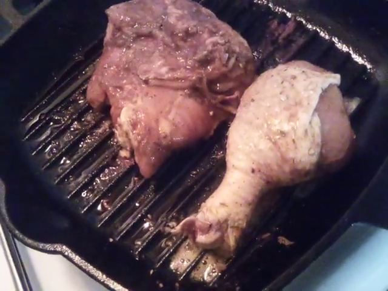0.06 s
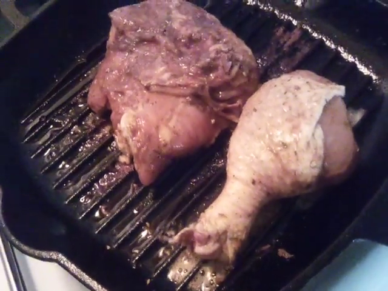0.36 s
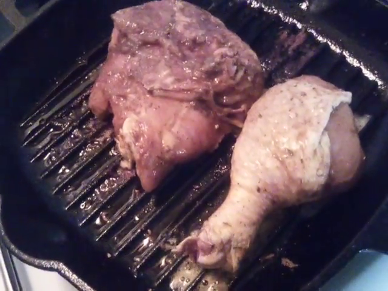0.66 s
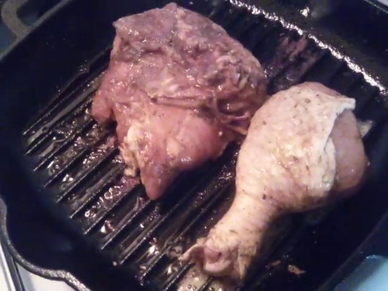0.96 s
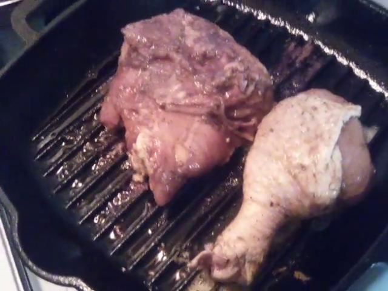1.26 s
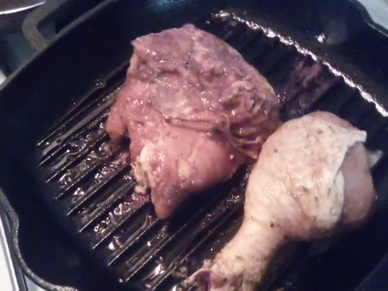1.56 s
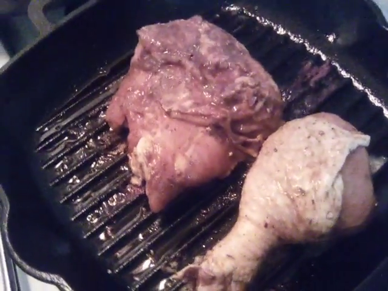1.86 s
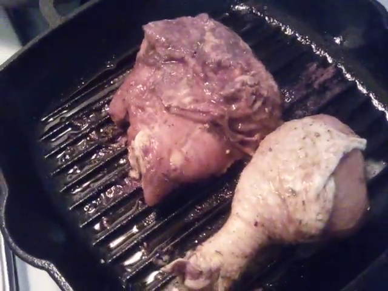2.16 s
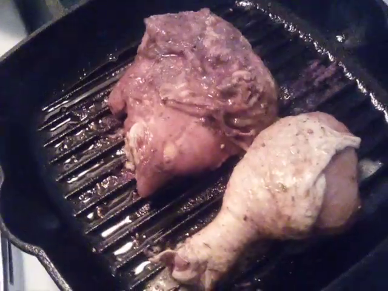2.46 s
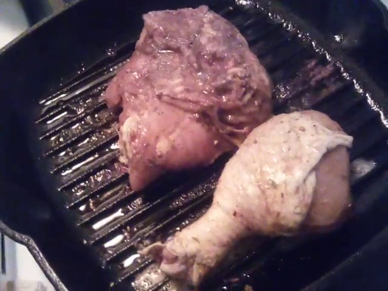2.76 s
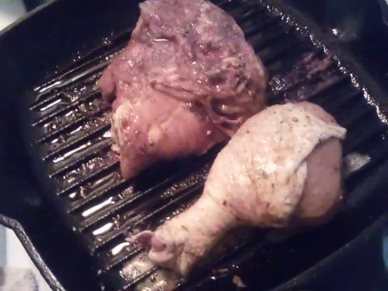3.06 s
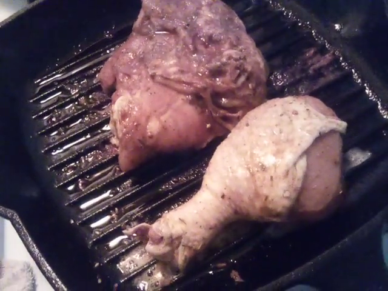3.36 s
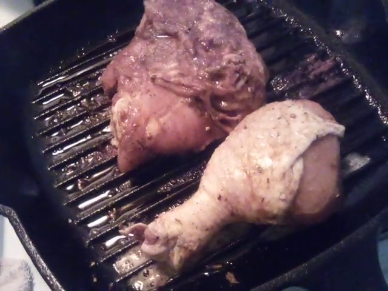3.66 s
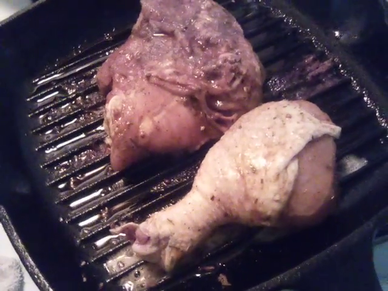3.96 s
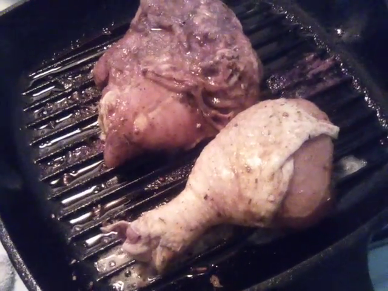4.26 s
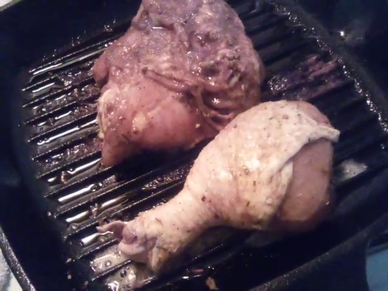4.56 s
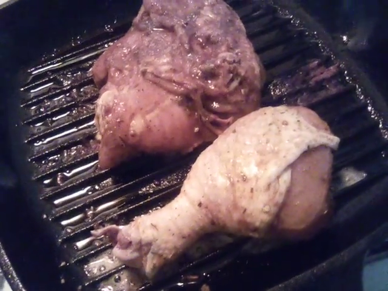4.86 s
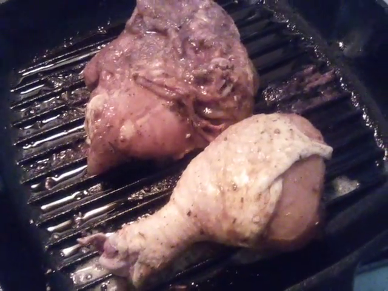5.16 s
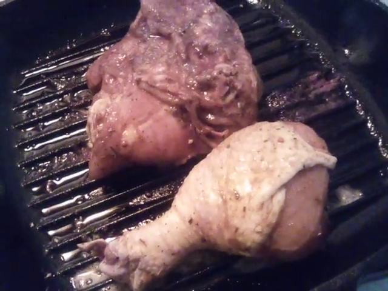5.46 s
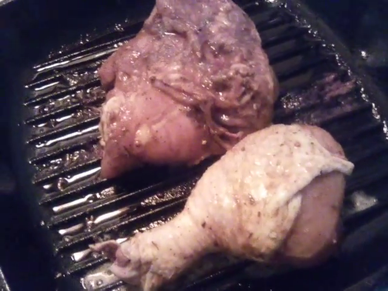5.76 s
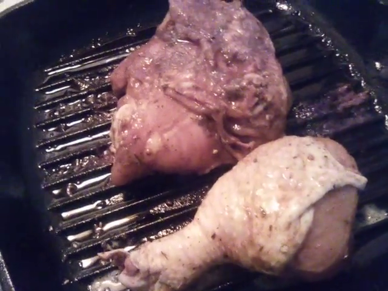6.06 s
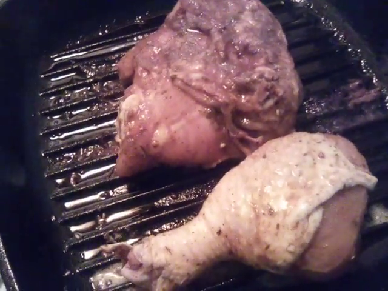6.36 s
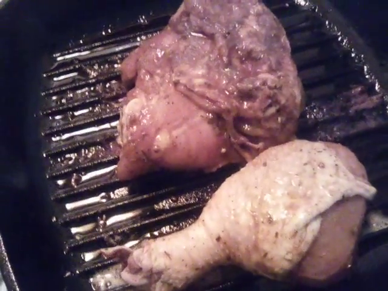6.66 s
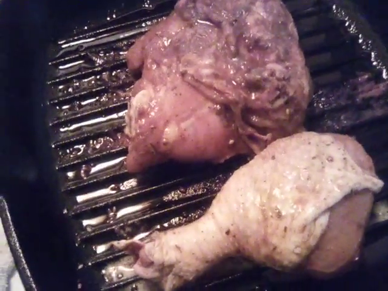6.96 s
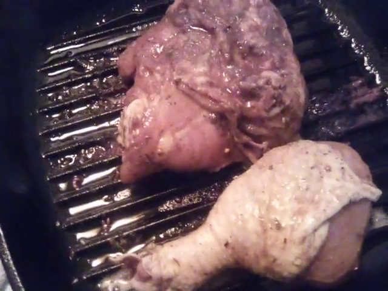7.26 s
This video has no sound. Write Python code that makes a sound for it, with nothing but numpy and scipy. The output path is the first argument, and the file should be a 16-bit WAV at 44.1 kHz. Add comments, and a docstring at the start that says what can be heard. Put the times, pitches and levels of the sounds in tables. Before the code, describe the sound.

Meat fries in a ribbed iron pan, heard up close as a continuous high hiss with dense crackling. Sharp droplet ticks, short squeaky spits and small pops of fat come at irregular moments, some with a slight ring from the iron. The sizzle swells a little at the end with a brief sputter of steam. Behind it are only a faint kitchen hum and a few soft low bumps.

```python
"""Chicken sizzles in an oiled cast-iron grill pan, close by in a home kitchen.
Tiny steam bubbles burst in a bright fizz; larger ones crackle between the ribs. Fat gurgles and pops,
pockets of juice spit in short chirps, droplets snap, and the iron rings. Near the end, spurts of steam
ring a groove of the pan. Underneath: faint mains hum, kitchen rumble and a few soft low bumps."""
import sys
import numpy as np
from scipy import signal
from scipy.fft import rfft, irfft
from scipy.io import wavfile

SR = 44100
rng = np.random.default_rng(int(sys.argv[2]) if len(sys.argv) > 2 else 0)


def master_out(mix):
    """Clip the mix to full scale and print it as 16-bit PCM to the path in sys.argv[1]."""
    frames = np.transpose(np.atleast_2d(mix))
    ceiling = np.clip(frames, -1, 1)
    pcm = np.round(ceiling * 32767).astype(np.int16)
    wavfile.write(sys.argv[1], SR, pcm)


N = 326547
TIME_S = np.arange(N) / SR

# Table levels are relative; each source adds its own gain.
# boiling of the oil: t/s, level/dB
OIL_BOIL = [(0.0, -46.5), (0.89, -47.5), (1.03, -44), (1.52, -48.5), (1.98, -47.5), (2.39, -46.5),
            (4.0, -49.5), (4.43, -45.5), (4.74, -47.5), (6.55, -46), (7.4, -42)]
# simmering of the juice under the meat: t/s, level/dB
JUICE_SIMMER = [(0.0, -57), (0.37, -57.5), (1.2, -57.5), (1.95, -58), (2.4, -57), (3.3, -58.5),
                (3.7, -58.5), (4.25, -57), (4.63, -59.5), (5.3, -55), (5.7, -57), (6.55, -56.5),
                (6.73, -56.5), (6.85, -55), (7.05, -54), (7.4, -57.5)]
# spectra of one burst of each kind: f/Hz, level/dB
FIZZ_SPECTRUM = [(500, -45.5), (2000, -18), (3100, -22), (6000, -18), (8400, -22.5), (9400, -17),
                 (10400, -13), (10800, -9), (12300, -3), (13800, -10), (15000, -15), (16000, -2.5)]
CRACKLE_SPECTRUM = [(200, -21), (750, -7.5), (1100, -2.5), (1600, -5.5), (3050, 3.5), (3700, 2),
                    (4500, 2.5), (6300, 4.5), (7300, 6.5), (8400, -26), (12000, 8)]
SPLUTTER_SPECTRUM = [(200, -33.5), (700, -1.5), (1100, -4.5), (1600, 5.5), (2500, 4.5), (3100, 2.5),
                     (6000, 9), (8400, 6.5), (11000, -16.5)]
# resonances of the iron pan and its hollow: f/Hz, width/Hz, level/dB
PAN_MODES = [(515, 30, -11), (920, 50, -15), (1185, 45, -5), (1355, 40, -7), (1453, 40, -9),
             (1610, 120, -4.5), (2030, 60, -7), (2280, 70, -7), (2660, 110, -7), (3600, 80, -5),
             (3830, 80, -6), (4040, 80, -6), (4450, 90, -7), (4620, 80, -9), (5110, 80, -7), (5385, 70, -7),
             (5950, 90, -10), (6245, 80, -8)]
# kitchen rumble: f/Hz, level/dB
RUMBLE_SPECTRUM = [(20, -5), (50, -9.5), (90, -1.5), (135, -0.5), (185, -2.5), (240, 2.5), (300, -2),
                   (380, -7.5), (700, -10), (1500, -20.5), (6000, -28)]
# mains hum: f/Hz, level/dB
MAINS_HUM = [(119.5, -86.5)]
# slow fat bubbles, and two rows at 5.5 s that give a pop there its dull low body: t/s, peak level/dB, f/Hz,
# length/s
FAT_GURGLES = [(0.118, -53.5, 1360, 0.084), (0.696, -51, 1330, 0.022), (0.994, -49.5, 1480, 0.1),
               (1.762, -43, 1534, 0.031), (1.826, -47, 1350, 0.02), (2.019, -48, 1500, 0.023),
               (2.451, -51, 1640, 0.047), (3.114, -51.5, 1680, 0.08), (3.606, -50.5, 1380, 0.032),
               (3.905, -50, 1600, 0.032), (3.955, -53, 2300, 0.025), (5.497, -54.5, 775, 0.015),
               (5.5, -55, 1100, 0.012), (5.605, -52, 1470, 0.025), (5.844, -53.5, 1150, 0.049),
               (7.194, -39, 1660, 0.0053), (7.38, -41, 2030, .04)]
# spitting pockets of juice: t/s, ping level/dB, f/Hz, steam level/dB, time to run dry/s
JUICE_SPITS = [(0.2392, -40.0, 4060, -52.0, 0.03), (0.2655, -39.5, 5040, -59.5, 0.02),
               (0.6202, -39.0, 3780, -53.5, 0.026), (0.7309, -43.0, 3800, -54.5, 0.029),
               (0.9316, -44.5, 9000, -66.0, 0.01), (1.0144, -50.5, 4500, -61.0, 0.03),
               (1.2958, -44.5, 4650, -62.0, 0.04), (1.4463, -41.5, 6200, -61.0, 0.02),
               (1.5114, -45.0, 5500, -61.0, 0.025), (1.775, -39.5, 3900, -54.0, 0.037),
               (2.2719, -33.5, 3340, -46.0, 0.026), (2.4452, -41.5, 4700, -56.0, 0.04),
               (2.4732, -41.0, 4690, -54.5, 0.04), (2.4899, -38.5, 3800, -56.0, 0.045),
               (2.8885, -37.0, 5080, -54.0, 0.03), (2.9062, -38.0, 4700, -57.0, 0.05),
               (2.9619, -39.5, 4550, -60.0, 0.025), (3.0225, -38.0, 4300, -50.5, 0.012),
               (3.0328, -28.0, 4500, -53.5, 0.028), (3.1024, -35.5, 4550, -55.0, 0.02),
               (3.1092, -36.5, 4050, -57.5, 0.028), (3.1962, -38.5, 4620, -56.5, 0.03),
               (3.3232, -37.5, 4200, -56.0, 0.025), (3.395, -38.5, 5370, -57.0, 0.04),
               (3.486, -41, 4300, -60, .02), (3.635, -39, 4620, -57, .025),
               (3.7789, -40, 5200, -55.5, 0.025), (3.783, -39, 4300, -57, .02),
               (3.893, -37, 6600, -53.5, .03), (3.915, -44, 3700, -58, .06), (3.985, -41, 4100, -58, .02),
               (4.02, -32.0, 4420, -50.0, 0.04), (4.1147, -40.0, 5400, -58.0, 0.03),
               (4.3189, -29.0, 4560, -47.5, 0.02), (4.3278, -25.5, 4500, -47.5, 0.04),
               (4.3478, -33.5, 4350, -54.0, 0.03), (4.3915, -34.0, 4080, -51.5, 0.06),
               (4.4347, -31.0, 3700, -53, 0.07), (4.4608, -36.5, 5400, -51.5, 0.02),
               (4.4692, -31.0, 5300, -57, 0.04), (4.7019, -31, 5300, -49.5, 0.018),
               (4.722, -41, 5700, -54, .035), (4.817, -40, 3700, -59, .02),
               (4.9007, -38.0, 4620, -62.5, 0.04), (5.0883, -36, 5400, -52.0, 0.02),
               (5.1936, -34.0, 4050, -50.5, 0.02), (5.2317, -39.5, 3450, -57.0, 0.025),
               (5.5862, -33.5, 4160, -51.0, 0.027), (5.712, -39, 5900, -56, .02),
               (5.8978, -38.5, 4400, -59.0, 0.045), (6.03, -41, 5000, -59, .02),
               (6.232, -39.0, 4700, -59.0, 0.028), (6.3559, -38.0, 4440, -54.5, 0.02),
               (6.4396, -36.5, 4440, -52.5, 0.034), (6.6261, -35.0, 3940, -50.0, 0.033),
               (6.7812, -38.0, 3950, -55.5, 0.03), (6.7958, -40, 4450, -56, .025),
               (6.815, -43, 3620, -57.0, 0.04), (7.3107, -45.5, 4150, -56.0, 0.025),
               (7.3349, -41.0, 4300, -56.5, 0.03)]
# soft low bumps: t/s, length/s, peak level/dB, f/Hz
LOW_BUMPS = [(0.301, 0.032, -75, 116), (1.447, 0.058, -69.5, 144), (2.085, 0.044, -67, 113),
             (4.127, 0.034, -73, 118), (4.41, 0.043, -74, 235), (4.6, 0.036, -73, 122),
             (4.664, 0.056, -69, 118), (5.4, 0.13, -63.5, 233), (5.503, 0.0096, -76, 440),
             (5.64, 0.1, -65.5, 125), (7.19, 0.061, -65.5, 235)]
# exploding droplets: t/s, peak level/dB
DROPLET_SNAPS = [(0.5506, -31), (0.5631, -29), (0.824, -26), (0.9393, -24), (1.1333, -27), (1.1563, -26),
                 (1.1884, -24), (1.5828, -29), (1.6751, -28), (1.6881, -27), (1.8487, -23.5), (2.642, -34),
                 (2.7444, -26), (2.9773, -27), (3.134, -25.5), (3.207, -24), (3.5513, -26), (3.9973, -24),
                 (4.0543, -25), (4.2522, -26), (4.5572, -22.5), (4.782, -22), (5.044, -29), (5.2124, -20.5),
                 (5.3502, -30), (5.6274, -32), (5.848, -25), (6.1485, -26), (6.1598, -22.5), (6.6363, -21),
                 (6.6834, -29), (6.7805, -27), (7.229, -23)]
# fat pops: t/s, knock level/dB, splutter level/dB, build-up/s, time to run dry/s, hollow f/Hz
FAT_POPS = [(0.583, -55, -69.5, .002, 0.013, 2260), (0.707, -39, -58, 0.0041, 0.042, 4000),
            (0.855, -46, -63, 0.002, 0.012, 3070), (0.9167, -45, -69, 0.0055, 0.03, 3480),
            (0.9908, -40, -60.5, 0.0052, 0.032, 3140), (1.066, -45, -63, 0.0044, 0.014, 2970),
            (1.147, -48, -60.5, .002, 0.053, 2280), (1.273, -36, -54.5, 0.008, 0.031, 3150),
            (1.422, -50, -64.5, 0.035, 0.015, 2330), (1.5838, -37.5, -66.5, 0.00067, 0.011, 1690),
            (2.0293, -47.5, -77, 0.002, 0.039, 2200), (2.242, -45, -59, 0.0042, 0.017, 2840),
            (2.4637, -49, -69, 0.0035, 0.043, 1710), (2.5538, -40, -59.5, 0.0004, 0.021, 2680),
            (2.7466, -44, -68, 0.0012, 0.023, 3030), (2.8475, -59, -60.5, 0.002, 0.094, 3040),
            (2.934, -50, -64, 0.012, 0.073, 4840), (3.111, -50, -62.5, 0.0046, 0.03, 3040),
            (3.5241, -44, -62.5, 0.0011, 0.014, 2600), (3.611, -42, -66, 0.0022, 0.019, 1420),
            (3.8939, -42, -58.5, 0.013, 0.047, 2480), (4.388, -46, -63, 0.0037, 0.044, 5000),
            (4.435, -35.5, -51.5, 0.0025, 0.023, 2480), (4.4706, -44, -57, .008, 0.06, 4870),
            (4.566, -44, -65, .001, 0.016, 3300), (4.7314, -40, -55.5, 0.0041, 0.048, 2440),
            (4.926, -49, -55.5, 0.0022, 0.051, 4900), (5.147, -40, -59.5, 0.0029, 0.007, 4300),
            (5.503, -46, -69, 0.003, 0.039, 1300), (5.55, -40, -57, 0.0036, .015, 6000),
            (5.959, -42, -63, .004, 0.018, 4500), (6.063, -45, -70, .002, .01, 1950),
            (6.1624, -44, -61.5, 0.00066, 0.016, 2720), (6.286, -50, -76, .002, 0.0048, 1910),
            (6.359, -59, -63, .003, 0.017, 2360), (6.441, -50, -63, .003, .03, 2580),
            (6.6261, -38, -62, 0.002, 0.02, 3170), (6.862, -45, -62, 0.0015, 0.028, 4360),
            (6.967, -50, -59, 0.0012, 0.094, 2940), (7.103, -34, -72, 0.00072, 0.0072, 3230)]
# steam spurts from a groove: t/s, level/dB, time to run dry/s
STEAM_SPURTS = [(7.102, -52, .018), (7.138, -55, .012), (7.164, -53, .016), (7.196, -49, .022),
                (7.223, -53.5, .035), (7.255, -53.5, .04), (7.3, -60, .03), (7.355, -58, .02),
                (7.383, -55, .04)]
# resonances of that groove: f/Hz, width/Hz, level/dB
GROOVE_MODES = [(930, 35, -19), (1210, 35, -5), (1470, 40, -6), (1650, 60, 2), (1740, 60, 0),
                (2020, 60, -6), (2210, 50, -3), (3620, 45, -4), (4120, 80, 2.5), (4620, 50, -1),
                (6230, 130, -1)]
# kitchen reverberation: f/Hz, t60/s
ROOM_DECAY = [(200, 0.48), (1500, 0.16), (5000, 0.11), (14000, 0.39)]


def amp(db):
    """Decibels to gain."""
    return 10 ** (np.asarray(db) / 20)


def unit_rms(x):
    """Scales to rms 1."""
    return x / np.sqrt(np.mean(x ** 2) + 1e-20)


def at_peak(x, db=0):
    """Sets the peak level."""
    return amp(db) * x / abs(x).max()


def at_onset(x, db):
    """Sets the rms level of the first 25 ms."""
    return amp(db) * x / x[:SR // 40].std()


def lookup(table, hz):
    """Interpolates on a log-frequency axis."""
    table_hz, value = np.transpose(table)
    return np.interp(np.log(hz + 1), np.log(table_hz), value)


def follow(curve):
    """Level curve to gain per sample."""
    return amp(np.interp(TIME_S, *np.transpose(curve)))


def add(mix, t_s, sound):
    """Mixes a sound in at t_s."""
    part = mix[max(round(t_s * SR), 0):][:len(sound)]
    part += sound[:len(part)]


def convolve(x, response):
    """Convolution cut to the length of x."""
    return signal.oaconvolve(x, response)[:len(x)]


def click(spectrum, size=2048):
    """Minimum-phase pulse with this spectrum."""
    hz = abs(np.fft.fftfreq(size, 1 / SR))
    log_gain = np.log(amp(lookup(spectrum, hz)))
    return np.fft.ifft(np.exp(np.conj(signal.hilbert(log_gain)))).real[:size // 2]


def resonate(x, hz, width_hz):
    """Two-pole resonance, gain 1."""
    return signal.lfilter(*signal.iirpeak(hz, hz / width_hz, fs=SR), x)


def wander(corner_hz):
    """Random drift of rms 1, from 2 Hz up, fading above the corner."""
    hz = np.fft.rfftfreq(N, 1 / SR)
    band = (hz > 2) / (1 + (hz / corner_hz) ** 2)
    return unit_rms(irfft(rfft(rng.standard_normal(N)) * band, N))


def bursts(per_s, spread_db, size=N):
    """Bubbles burst at random, with either sign: many small, a few large."""
    draw = rng.random(size) * SR / per_s
    hits, train = np.flatnonzero(draw < 1), np.zeros(size)
    train[hits] = (-1.) ** hits * amp(spread_db * np.minimum(-np.log(draw[hits]), 4))
    return train


def surges(per_s, decay_s, depth):
    """One burst sets off its neighbours: the gain jumps, then decays."""
    kicks = rng.exponential(1, N) * (rng.random(N) < per_s / SR)
    flares = signal.lfilter([1], [1, -np.exp(-1 / (decay_s * SR))], kicks)
    return 1 + depth * np.tanh(flares)


def rim_echo(x, gain=1.0):
    """Reflection off the rim; the delay depends on the spot in the pan."""
    delay = int(rng.uniform(.001, .0025) * SR)
    return x + gain * np.pad(x, (delay, 0))[:len(x)]


def flurry(per_s, spread_db, t60_s, dry_s, build_s):
    """A train of bursts builds up, decays and runs dry; the rim echoes it."""
    t = np.arange(SR // 7) / SR
    rise = np.minimum(t / build_s, 1) ** 2
    fall = np.exp(-np.log(1000) * t / t60_s - (t / dry_s) ** 2)
    return rim_echo(bursts(per_s, spread_db, len(t)) * rise * fall)


def pan_ring(x):
    """The pan's hollow rings; each spot weights and detunes the modes differently."""
    spot = rng.uniform([-9, -.025], [5, .025], (len(PAN_MODES), 2))
    return sum(amp(db + weight_db) * resonate(x, hz * (1 + detune), width_hz)
               for (hz, width_hz, db), (weight_db, detune) in zip(PAN_MODES, spot))


def in_pan(x, ring_db):
    """Direct sound plus pan ring."""
    return x + amp(ring_db) * pan_ring(x)


def fizz(gain_db=1.0, haze_db=-.5, drift_db=2.1):
    """Tiny bubbles of three sizes, in a drifting mix, burst in clumps over a haze of smaller ones."""
    bubbles = np.zeros(N)
    for hz in (9500, 12200, 14800):
        ticks = resonate(bursts(per_s=900, spread_db=4.2), hz, width_hz=3200)
        bubbles += ticks * amp(drift_db * wander(corner_hz=6))
    train = unit_rms(bubbles) + amp(haze_db) * rng.standard_normal(N)
    train *= surges(per_s=80, decay_s=.004, depth=.9)
    return amp(gain_db) * follow(OIL_BOIL) * unit_rms(convolve(train, click(FIZZ_SPECTRUM)))


def crackle(gain_db=.94, spots=6):
    """Larger bubbles burst between the ribs; each spot flares up with its own colour and pan ring."""
    out = np.zeros(N)
    for hz in np.linspace(2000, 6600, spots):
        train = bursts(per_s=240, spread_db=3.4) * amp(4.5 * np.tanh(wander(corner_hz=12)))
        train *= surges(per_s=9, decay_s=.016, depth=2.2)
        out += in_pan(.8 * train + resonate(train, hz, width_hz=700), ring_db=11)
    return amp(gain_db) * follow(JUICE_SIMMER) * unit_rms(convolve(out, click(CRACKLE_SPECTRUM)))


def bubbling(gain_db=-8, spots=20):
    """Fat bubbles under the meat in overlapping spells; only a diffuse pan ring gets out."""
    out, splash = np.zeros(N), click(SPLUTTER_SPECTRUM)
    for _ in range(spots):
        spell = flurry(per_s=1500, spread_db=1.5, t60_s=.2, dry_s=.035, build_s=.005)
        ring = pan_ring(convolve(spell, splash))
        out += convolve(bursts(per_s=3, spread_db=1), unit_rms(ring))
    return amp(gain_db) * follow(JUICE_SIMMER) * unit_rms(out)


def kitchen(rumble_db=-74.5, swell_db=1.73):
    """Mains hum of an appliance and gently swelling room noise."""
    hum = sum(amp(db) * unit_rms(np.sin(2 * np.pi * (hz * TIME_S + rng.random())))
              for hz, db in MAINS_HUM)
    noise = rng.standard_normal(N) * amp(swell_db * wander(corner_hz=15))
    return hum + amp(rumble_db) * unit_rms(convolve(noise, click(RUMBLE_SPECTRUM, size=8192)))


def gurgles(gain_db=-4):
    """Quick puffs of steam keep a fat bubble ringing."""
    out, t = np.zeros(N), np.arange(SR // 4) / SR
    for t_s, db, hz, length_s in FAT_GURGLES:
        puffs = bursts(per_s=900, spread_db=2.5, size=len(t)) * np.exp(-(t / length_s) ** 4)
        ring = resonate(resonate(puffs, hz, width_hz=130), hz, width_hz=1000)
        add(out, t_s, at_peak(ring, db + gain_db))
    return out


def faint_spits(count=18):
    """Small pockets at random times and pitches; rows as in JUICE_SPITS."""
    return [(when * N / SR, -46 + 2 * size, 4900 * 2 ** (.5 * pitch), -63 + 2 * size, .03)
            for when, size, pitch in rng.uniform([0, -1, -1], 1, (count, 3))]


def spits(ping_gain_db=-1.0, steam_gain_db=-1.6, spray_gain_db=-12, build_s=.007, lag_s=.0001):
    """A juice pocket pings open; steam keeps narrow rings alive near its pitch and sprays droplets."""
    out, splash, droplet = np.zeros(N), click(SPLUTTER_SPECTRUM), click(FIZZ_SPECTRUM)
    for t_s, ping_db, hz, steam_db, dry_s in list(JUICE_SPITS) + faint_spits():
        steam = flurry(per_s=1000, spread_db=3.2, t60_s=1, dry_s=dry_s, build_s=build_s)
        ping = at_peak(resonate(resonate(splash, hz, hz / 17), hz, hz / 6))
        crack = resonate(splash, hz, hz / 2)
        add(out, t_s + lag_s, amp(ping_db + ping_gain_db) * (.75 * ping + .65 * at_peak(crack)))
        flow = unit_rms(convolve(steam, ping))
        tail = unit_rms(sum(resonate(steam, hz * rng.uniform(.87, 1.18), width_hz=20) for _ in range(4)))
        ring = unit_rms(resonate(pan_ring(pan_ring(steam)), hz, hz / 2))
        rasp = unit_rms(convolve(steam, crack))
        chirp = at_onset(flow + .85 * tail + 1.3 * ring + .7 * rasp, steam_db + steam_gain_db)
        spray = at_onset(convolve(steam, droplet), steam_db + spray_gain_db)
        add(out, t_s + lag_s - build_s, chirp + spray)  # steam leads the ping
    return out


def bumps(gain_db=6, relative_width=.26, margin_s=.02185):
    """Dull, soft swells of low noise."""
    out = np.zeros(N)
    for t_s, length_s, db, hz in LOW_BUMPS:
        width_hz = hz * relative_width
        noise = resonate(resonate(rng.standard_normal(SR), hz, width_hz), hz, width_hz)
        window = signal.windows.tukey(int((length_s + 2 * margin_s) * SR), .7)
        add(out, t_s - margin_s, at_peak(noise[-len(window):] * window, db + gain_db))
    return out


def snaps(gain_db=3, spray_gain_db=-28.5, tick_hz=12080, lag_s=.0006):
    """A droplet explodes with a short bright tick and scatters smaller ones."""
    out, crack = np.zeros(N), click(FIZZ_SPECTRUM)
    tick = resonate(crack, tick_hz, width_hz=2200) + .55 * crack
    for t_s, db in DROPLET_SNAPS:
        spray = flurry(per_s=2500, spread_db=2, t60_s=.04, dry_s=.012, build_s=.0003)
        add(out, t_s + lag_s, at_peak(tick, db + gain_db))
        add(out, t_s + lag_s, at_onset(convolve(spray, tick), db + spray_gain_db))
    return out


def pops(knock_gain_db=3.5, splutter_gain_db=4.0, knock_hz=930):
    """Oil splutters and a pop knocks on the iron; a hollow under the meat adds body, the pan rings."""
    out, splash = np.zeros(N), click(SPLUTTER_SPECTRUM, size=8192)
    thud = resonate(splash, knock_hz, width_hz=500)
    for t_s, knock_db, splutter_db, build_s, dry_s, hz in FAT_POPS:
        body = resonate(splash, hz, hz / 3) + .2 * splash
        oil = flurry(per_s=1400, spread_db=2, t60_s=.25, dry_s=dry_s + build_s, build_s=build_s)
        knock = rim_echo(in_pan(body + thud, ring_db=8), gain=.5)
        splutter = in_pan(convolve(oil, body), ring_db=15)
        add(out, t_s, at_peak(knock, knock_db + knock_gain_db))
        add(out, t_s - build_s, at_onset(splutter, splutter_db + splutter_gain_db))
    return out


def spurts(kick=9):
    """Steam spurts start with a kick and ring a groove; each weights the modes differently."""
    out = np.zeros(N)
    for t_s, spurt_db, dry_s in STEAM_SPURTS:
        puffs = flurry(per_s=1200, spread_db=2, t60_s=.15, dry_s=dry_s, build_s=.0005)
        puffs[0] += kick
        ring = np.zeros(len(puffs))
        for hz, width_hz, db in GROOVE_MODES:
            mode = resonate(resonate(puffs, hz, .7 * width_hz), hz, 3.5 * width_hz)
            ring += amp(db + rng.uniform(-2, 2)) * unit_rms(mode)
        add(out, t_s, at_onset(ring, spurt_db))
    return out


def room(x, wet_db, echoes_per_s=4000):
    """Adds sparse echoes from hob and walls; the decay time depends on frequency."""
    taps = rng.choice([-1., 1.], SR // 2) * (rng.random(SR // 2) < echoes_per_s / SR)
    hz, t, spectra = signal.stft(taps, SR, nperseg=256)
    decay = amp(-60 * t / lookup(ROOM_DECAY, hz)[:, None])
    tail = signal.istft(spectra * decay, SR)[1]
    return x + amp(wet_db) * convolve(x, tail / np.linalg.norm(tail))


def scene():
    """Mono mix; each pan layer has its own room echoes."""
    bright = room(fizz(), wet_db=-13) + room(snaps(), wet_db=-7)
    layers = crackle(), bubbling(), pops(), gurgles(), spurts(), spits()
    body = sum(room(layer, wet_db=-4) for layer in layers)
    return (bright + body + bumps() + kitchen())[None]


def record(dry):
    """Steep low-pass at 15.9 kHz."""
    lowpass = signal.firwin(511, 15900, window=("kaiser", 9), fs=SR)
    return signal.oaconvolve(dry, lowpass[None], "same")


dry = scene()
out = record(dry)
master_out(out)
```